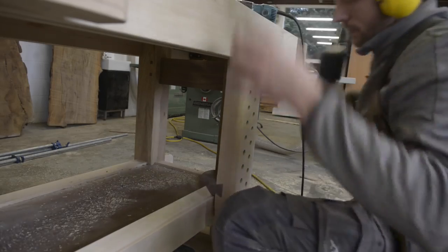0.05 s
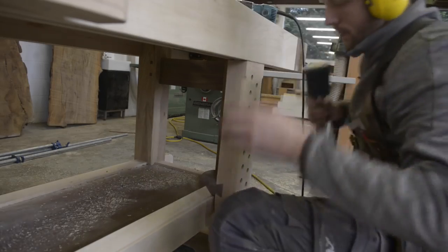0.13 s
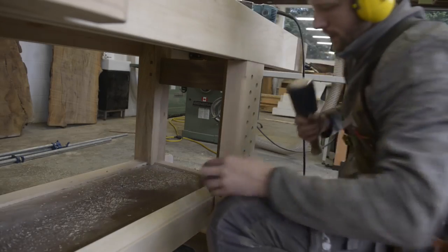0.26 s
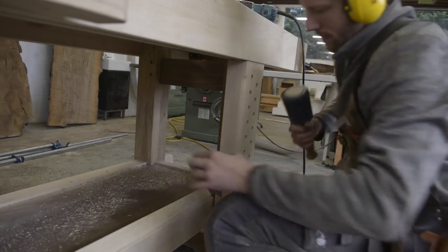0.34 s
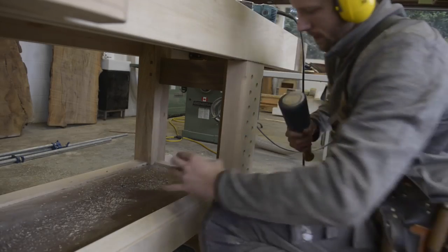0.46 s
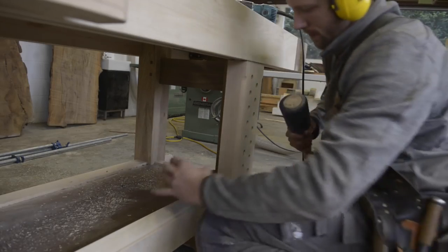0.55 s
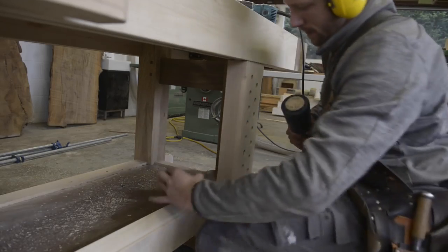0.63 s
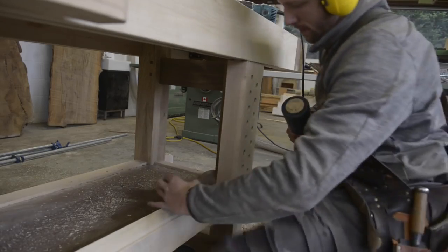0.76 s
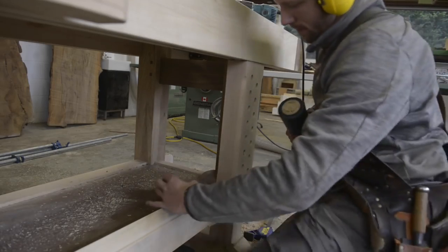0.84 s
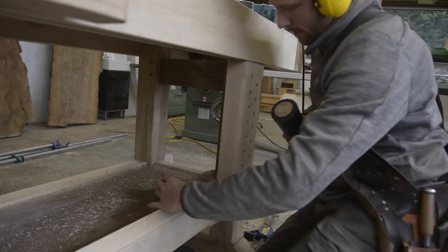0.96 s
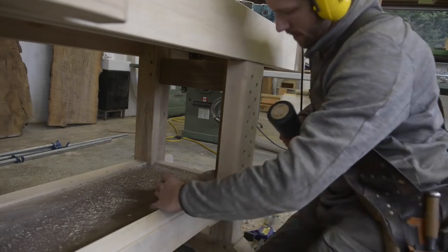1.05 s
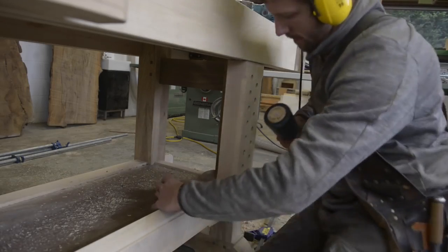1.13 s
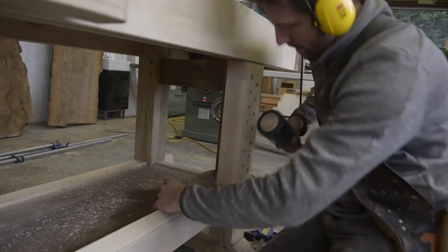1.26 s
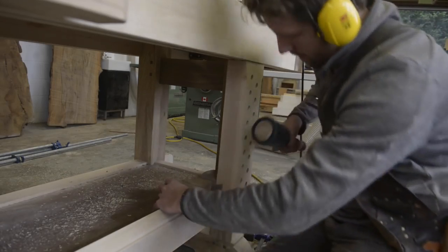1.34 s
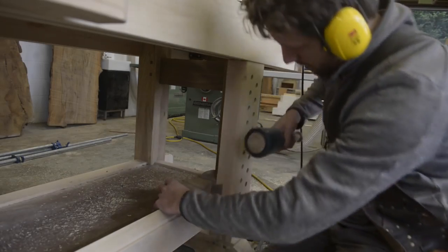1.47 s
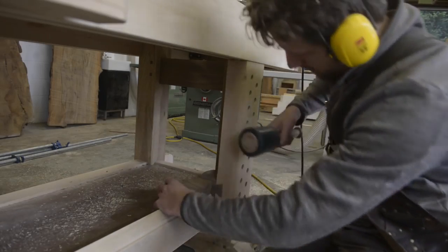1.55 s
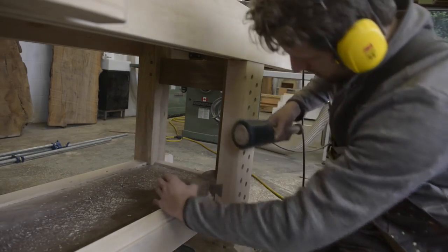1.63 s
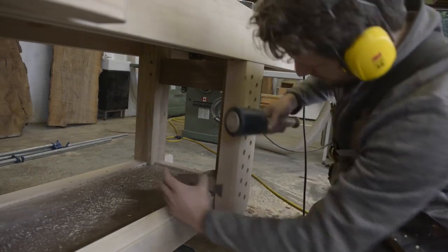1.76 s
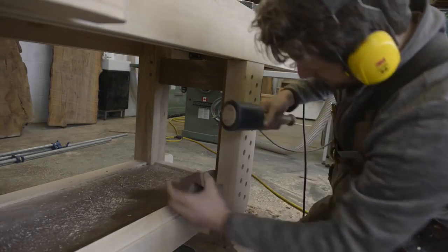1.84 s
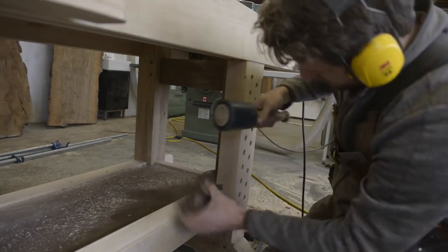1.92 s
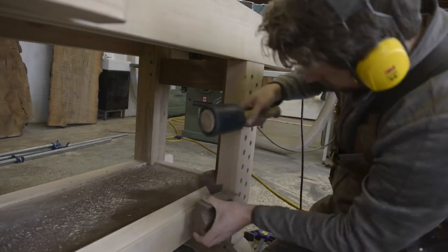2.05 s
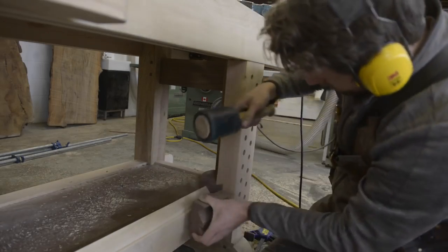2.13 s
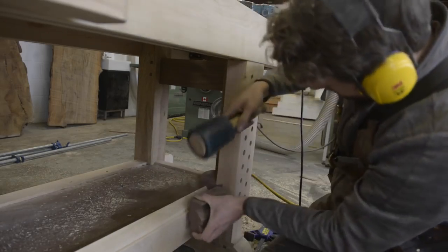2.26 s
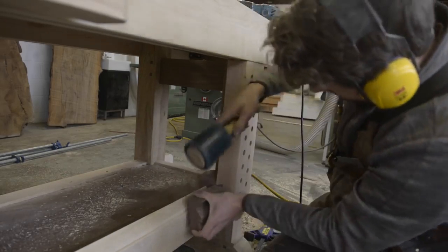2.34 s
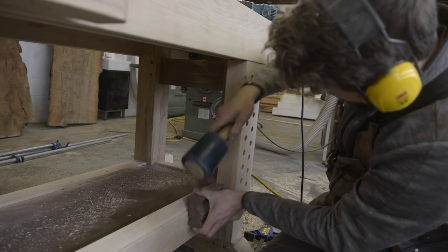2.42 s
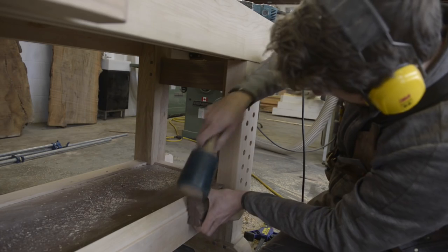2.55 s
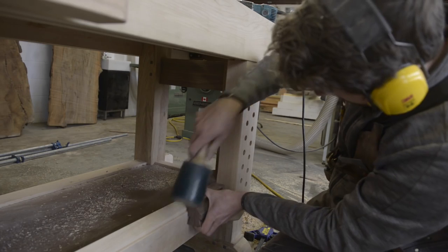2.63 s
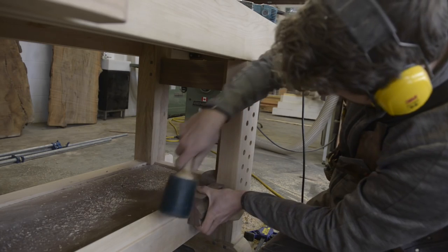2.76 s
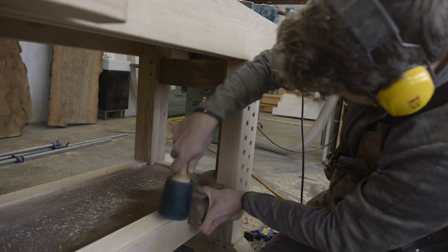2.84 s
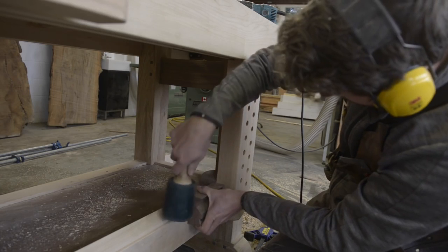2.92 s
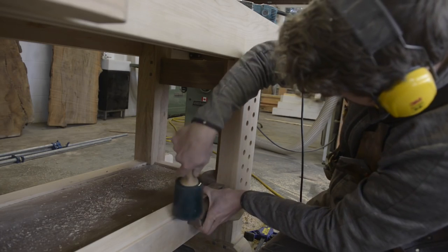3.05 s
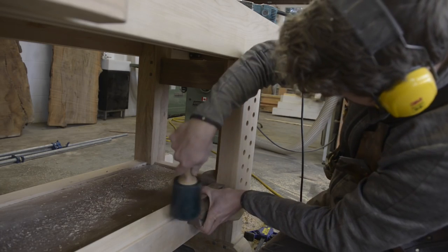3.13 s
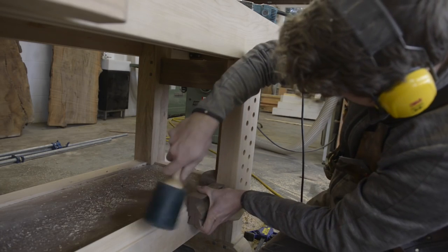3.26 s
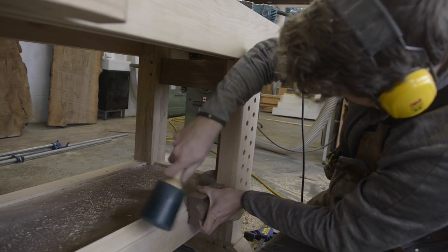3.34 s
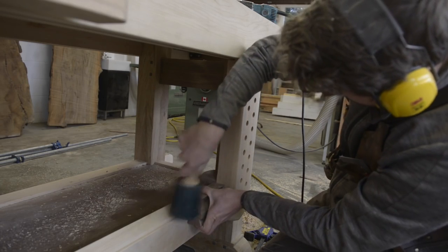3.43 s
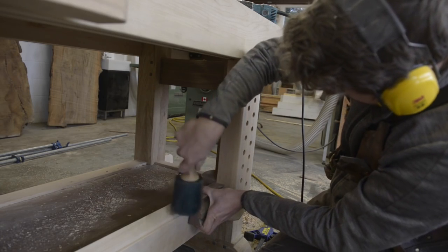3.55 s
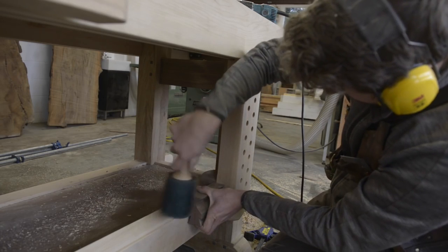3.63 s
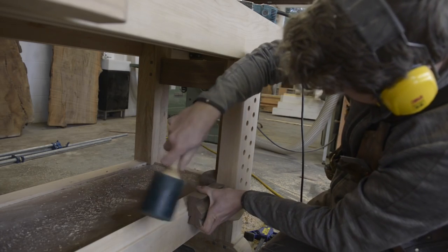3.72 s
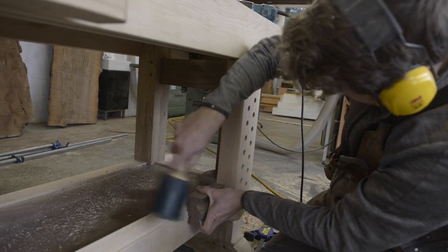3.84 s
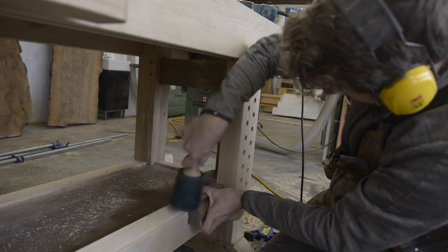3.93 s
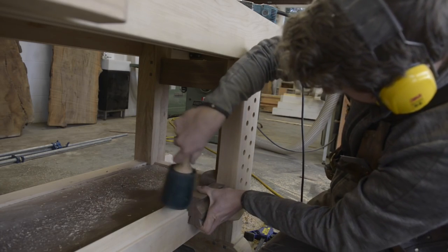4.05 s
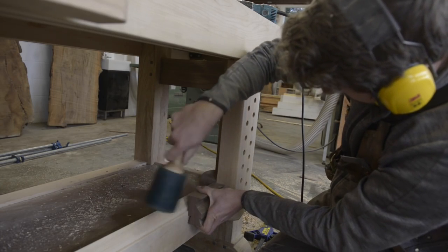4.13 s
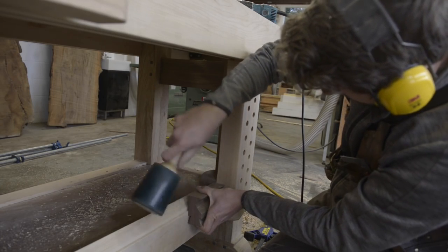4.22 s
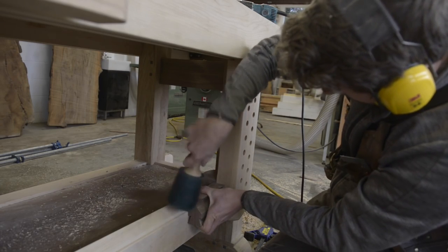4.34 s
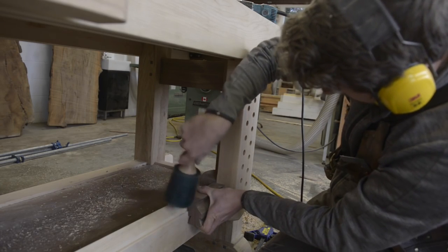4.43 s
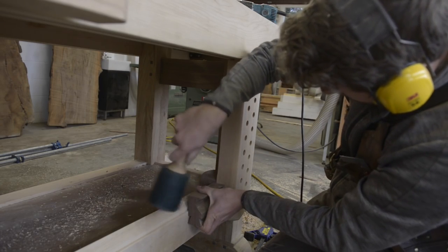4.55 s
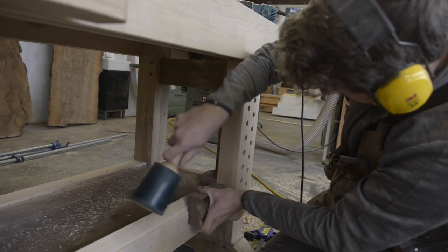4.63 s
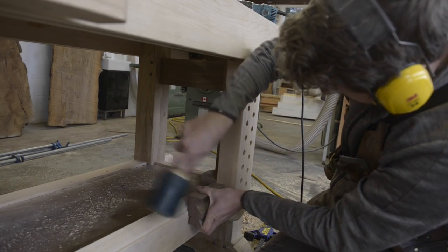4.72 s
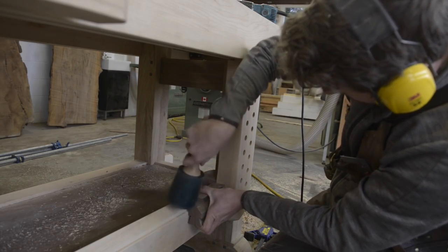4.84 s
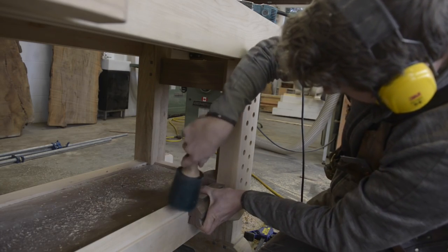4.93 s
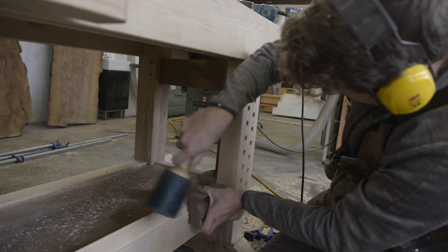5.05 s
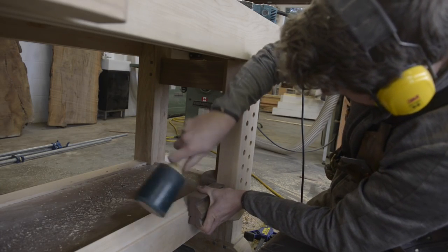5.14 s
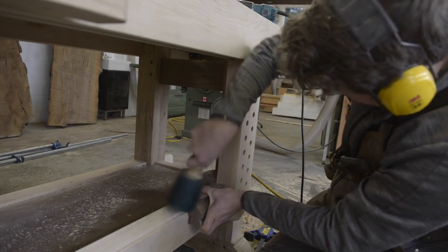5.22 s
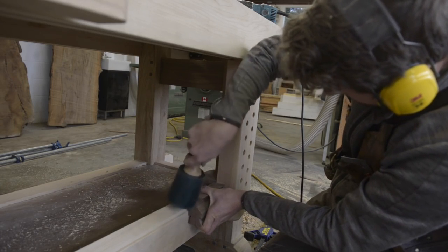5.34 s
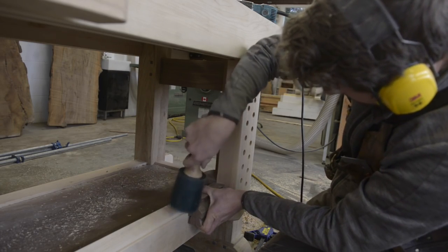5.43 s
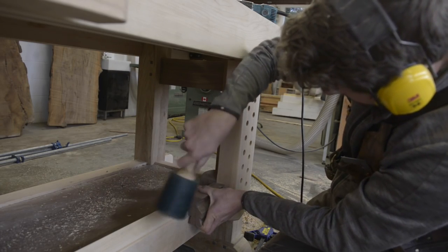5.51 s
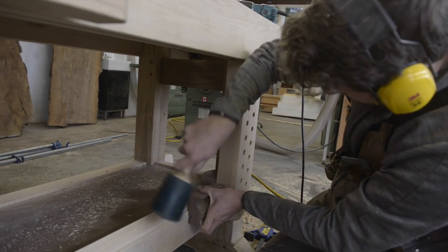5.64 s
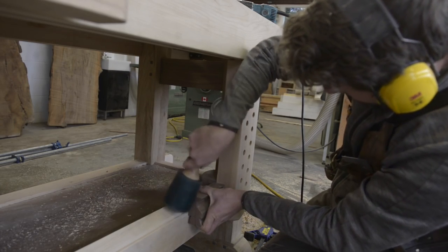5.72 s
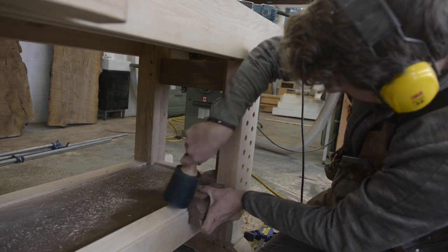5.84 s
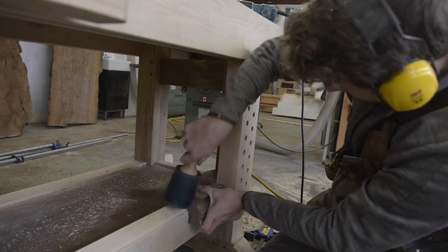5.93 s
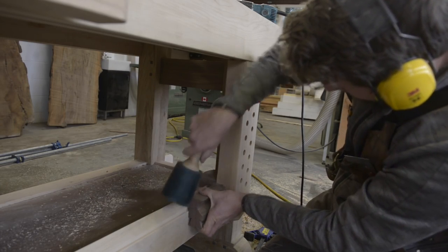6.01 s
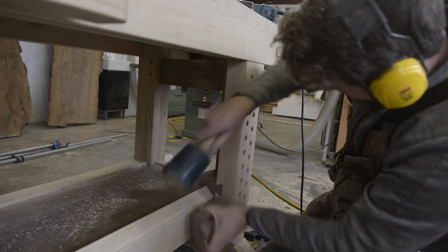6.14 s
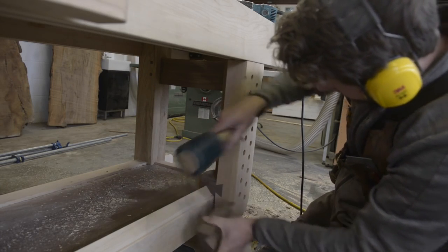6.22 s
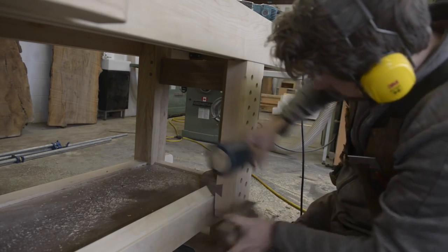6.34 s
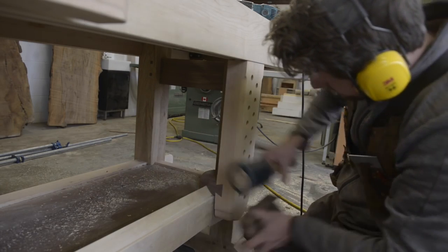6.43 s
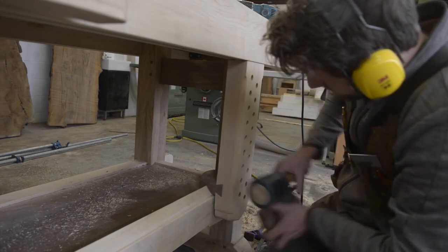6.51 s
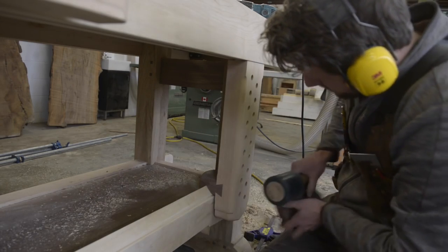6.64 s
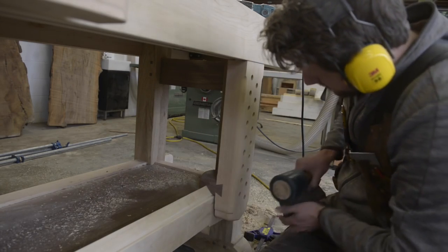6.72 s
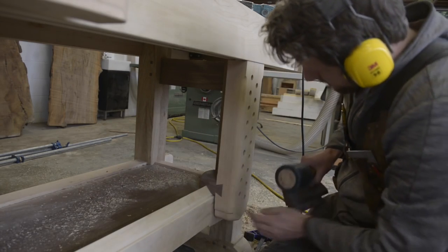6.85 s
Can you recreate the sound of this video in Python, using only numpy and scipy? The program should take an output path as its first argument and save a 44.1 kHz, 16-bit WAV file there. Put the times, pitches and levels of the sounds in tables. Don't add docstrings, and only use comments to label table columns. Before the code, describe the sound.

Soft fabric rustling over low room air, a muted touch and a firmer wooden clack, then faint dragging and small finger clicks. After a near-silent pause with one soft tap, a rubber-headed mallet strikes a block against a heavy timber frame six times, dull but powerful, building to near overload. Each knock rings briefly and blooms in the hall. Sleeves, falling grit and a small click end it. Close microphone, one channel.

```python
import sys
import numpy as np
from scipy import signal
from scipy.fft import rfft, irfft
from scipy.io import wavfile
from scipy.ndimage import uniform_filter1d

SR = 44100
rng = np.random.default_rng(int(sys.argv[2]) if len(sys.argv) > 2 else 0)


def transcribe(u):
    v = np.clip(np.atleast_2d(u).T, -1, 1)
    q = np.round(v * 32767).astype(np.int16)
    wavfile.write(sys.argv[1], SR, q)


def invert_db(level):
    return 10 ** (np.asarray(level, dtype=float) / 20)


N = 303171

# f/Hz, density/dB per Hz
AIR_SPECTRUM = [(15, -47.5), (25, -25), (92, 1.5), (270, 9), (775, -4.5), (1100, 1), (4870, -23.5),
                (10700, -19), (14800, -22.5), (16000, -58)]
# start t/s, hold/s, hiss level/dB, low scuff/dB above hiss, sleeve swish/dB above hiss
MOVEMENTS = [(-.05, .12, -59, 2, -8), (0.047, 0.013, -57, -8, -13), (.13, 0.21, -63.5, 1, -0.5),
             (0.335, 0.13, -56.5, -1, -2), (0.493, 0.19, -59.5, 4, -9), (0.69, 0.21, -57, -4, 0.5),
             (.9, 0.29, -60.5, 1, -1.5), (1.216, 0.067, -60, 2, -2), (1.39, 0.097, -65.5, 10, -1.5),
             (1.504, 0.28, -69.5, 9, -3), (1.72, 0.23, -60, .1, -1), (1.995, .33, -67.5, 3.3, -5),
             (2.38, 0.18, -70, 5, -10), (2.6, 0.18, -69.5, 9.5, -10), (2.85, .3, -78.5, 5, -4),
             (3.248, 0.3, -85, 15, -4), (6.006, 0.1, -67.5, 24, -7), (6.185, 0.18, -65.5, 3, 3),
             (6.284, 0.36, -60, -2.5, 3), (6.688, 0.15, -62.5, -1, -4)]
# f/Hz, density/dB per Hz
CLOTH_SPECTRUM = [(880, -48), (1500, -0.5), (1710, -9), (1850, -7.5), (2590, -0.5), (7240, -7), (11500, -6),
                  (13700, -14.5), (16000, -12.5)]
# f/Hz, density/dB per Hz
SCUFF_SPECTRUM = [(18, -38.5), (30, -7), (184, -1.5), (386, -4.5), (500, -0.5), (548, -6), (601, -2.5),
                  (1110, -7.5), (2500, -15), (3250, -54.5), (5500, -120)]
# lower f/Hz, upper f/Hz
WEAVE_BANDS = [(900, 3500), (3500, 8500), (8500, 12000), (12000, 18000)]
# f/Hz, width/Hz, level/dB
DRAG_RESONANCES = [(1100, 270, 5.5), (2420, 88, 2), (4800, 540, -3), (6900, 1500, -8), (10500, 600, -11)]

# t/s, peak level/dB, centre f/Hz
TICKS = [(0.0668, -41, 5490), (0.5294, -60, 7390), (0.8094, -45, 5800), (1.0694, -53, 4540),
         (3.4968, -48, 9780), (4.3044, -63, 4800), (6.0774, -38.5, 4550), (6.1005, -42, 4700),
         (6.1416, -37, 4660), (6.4544, -45.5, 6770), (6.6064, -47, 9400), (6.7544, -46, 8370)]
# t/s, peak level/dB, centre f/Hz
BUMPS = [(0.529, -44, 650), (0.677, -47, 270), (1.235, -52, 214), (1.714, -49, 210), (1.943, -45, 253),
         (2.698, -40, 460), (2.857, -51, 374), (6.752, -47, 264), (6.825, -57, 440), (6.854, -54, 573)]
# t/s, peak level/dB, centre f/Hz
CLICKS = [(0.475, -42.5, 1100), (1.68, -55, 1400), (1.717, -46, 1500), (1.966, -44, 1060),
          (2.06, -53, 2200), (2.14, -55, 1800), (2.187, -49.5, 1500), (2.21, -56, 1800), (2.783, -45, 1630),
          (2.996, -48, 1310), (3.106, -54, 900), (3.446, -56, 1510), (3.487, -43.5, 1200),
          (6.643, -39.5, 890), (6.755, -50, 1500), (6.828, -53, 1900), (6.862, -52.5, 2300)]
# t/s, peak level/dB, centre f/Hz
DUST = [(2.11, -55, 10500), (2.233, -60, 13000), (2.48, -57, 12500), (2.495, -59, 11000),
        (2.7975, -57, 10400), (2.8659, -54, 12700), (2.9163, -53, 12600), (2.9452, -61, 12400),
        (2.9594, -59, 10700), (3.1976, -57, 10900), (3.2365, -57, 10500), (6.0302, -53, 12500),
        (6.0965, -51, 10900), (6.1195, -68, 9500), (6.1195, -50, 13100), (6.1314, -55, 10400),
        (6.1524, -56, 10500), (6.1634, -62, 9880)]
# t/s, peak level/dB
JINGLES = [
    (6.316, -49.5),
    (6.335, -56),
]
# f/Hz, level/dB, t60/s
TOOL_MODES = [(10600, -5, 0.13), (11600, 1, 0.082), (15450, 2, .06)]

# t/s, peak level/dB, thump/dB, knock/dB, crack/dB
PLACED = [
    (0.841, -34.5, -0.5, -21, .1),
    (1.325, -25, -5, -1.5, -5),
]
# t/s, peak level/dB, thump/dB, knock/dB, crack/dB
SEATED = [
    (2.54, -26.5, 7.5, -6.5, -21),
]
# t/s, peak level/dB, thump/dB, knock/dB, crack/dB
TAPS = [
    (3.122, -27, 9.9, -1, 10.3),
    (3.531, -34, 25, 5.5, 3.3),
]
# t/s, peak level/dB, hall level/dB
BLOWS = [
    (3.548, -9, -3.5),
    (4.014, -9.5, -1.5),
    (4.447, -6.5, -2),
    (4.877, -4.5, 0),
    (5.339, -2, -0.5),
    (5.806, -1, -2.5),
]
# t/s, peak level/dB, crack/dB, hall level/dB
REBOUNDS = [
    (5.376, -8.5, -4, -13.5),
    (5.843, -10, -12.5, -10),
    (4.055, -20, -14.5, -10),
    (4.892, -13.5, -1.5, -5.5),
    (4.912, -10.5, -3.5, -10),
]
# first blow level/dB, change/dB per blow
THUMP_TREND = (1, -1.29)
KNOCK_TREND = (5, -1.45)
CRACK_TREND = (-0.5, -0.69)
BANDS_HZ = [170, 550, 1800, 7000]

# f/Hz, level/dB, t60/s
LOOSE_MODES = [(370, 11, 0.32), (435, 4, 0.9), (597, -17, 0.27), (751, 27, 0.35), (1010, -12, 0.23),
               (1160, -18, .15), (1513, 23.5, 0.23), (1960, -6, 0.11), (2390, 26.5, 0.12)]
# f/Hz, level/dB, t60/s
WEDGED_MODES = [(406, 0, 0.26), (588, -2.5, 0.41), (656, 1, 0.34), (945, 0, 0.22), (1137, -14, .2),
                (1425, -7, .2), (1680, -3, .15), (2430, 2.5, .16), (2530, -11, 0.069)]
# f/Hz, level/dB, t60/s
RAIL_MODES = [(402.5, -2.5, 0.37), (465.5, -1, 0.57), (607, -16.5, 0.28), (885, -9, .2), (1060, -17, 0.19),
              (1404, -2, 0.29), (1680, -10, 0.17), (2370, -15, 0.19)]
# f/Hz, level/dB, t60/s
FRAME_MODES = [(329, -6.5, 1), (367, -10, 0.35), (410.5, -5.5, 0.31), (473.6, -1.5, 0.5), (526, -3.5, 0.31),
               (550, -14.5, 0.28), (591, -5, 0.43), (639.3, -3.5, 0.57), (676, -12.5, 0.58),
               (730.3, -0.5, 0.42), (791.4, -2.5, 0.37), (920, -6, 0.22), (966, -15.5, .3),
               (1187, -13.5, 0.19), (1282, -10.5, 0.33), (1384, -2.5, 0.34), (1630, -12.5, 0.32),
               (1770, -16, 0.17), (1898, -16, 0.25), (2072, -25, 0.14), (2490, -12.5, 0.15),
               (3120, -20.5, 0.11), (3573, -18.5, .15)]
# f/Hz, level/dB, t60/s
BENCH_MODES = [(98.7, -22.5, 0.26), (105.8, -22, 0.92), (116.1, -18, 0.34), (188, -15, 0.3), (210, -26, .4),
               (229.4, -20.5, 0.17), (256.6, -17, 0.43)]
# f/Hz, density/dB per Hz
LOOSE_RATTLE = [(59, -61), (100, -23.5), (484, -6), (854, -10.5), (1510, -11), (1780, -32), (1950, -14),
                (2430, -15), (2660, -36), (8000, -47), (10400, -80), (17600, -120)]
# f/Hz, density/dB per Hz
TIMBER_RATTLE = [(24, -54.5), (40, -43.5), (140, -18.5), (204, -9.5), (354, -9), (422, -4), (663, -6),
                 (790, -11), (965, -9), (1590, -9), (3930, -24.5), (13800, -31.5), (16000, -41)]
# f/Hz, density/dB per Hz
RADIATED = [(24, -56.5), (40, -38.5), (83, -17), (163, -8), (231, -2.5), (320, -6.5), (585, -0.5),
            (733, -7.5), (831, -11), (918, -11), (1040, -12), (1810, -17), (3300, -35.5), (11300, -57),
            (16000, -71.5)]

# delay/s, level/dB
WALLS = [(0.018, -18.5), (.037, -16), (.055, -23)]
# f/Hz, t60/s
HALL_DECAY = [(60, 0.79), (160, 0.99), (420, 0.94), (1100, 0.93), (2910, 0.83), (7680, 0.36)]


def shape(x, points):
    hz, db = np.transpose(points)
    grid = np.linspace(1, SR / 2, 2049)
    ceps = irfft(np.interp(np.log(grid), np.log(hz), db) * np.log(10) / 20)
    ceps[1:2048] *= 2
    ceps[2049:] = 0
    response = irfft(np.exp(rfft(ceps)))
    return signal.fftconvolve(x, response)[:len(x)]


def unit(x):
    return x / np.sqrt(np.mean(x ** 2))


def band(x, lo_hz, hi_hz):
    return signal.sosfilt(signal.butter(2, [lo_hz, min(hi_hz, .45 * SR)], "band", fs=SR, output="sos"), x)


def fade(t, t60):
    return np.exp(-np.log(1000) * t / t60)


def swell(hold_s, attack_s, t60):
    t = np.arange(int(1.2 * SR)) / SR
    attack = np.sin(np.pi / 2 * np.clip(t / attack_s, 0, 1)) ** 2
    return attack * fade(np.clip(t - attack_s - hold_s, 0, None), t60)


def add(out, x, s):
    i = int(s * SR)
    out[i:i + len(x)] += x[:N - i]


def walk(rate):
    k = int(SR / rate)
    steps = np.repeat(rng.standard_normal(N // k + 1), k)
    return uniform_filter1d(uniform_filter1d(steps, k), k)[:N]


def ring(modes, t, damp, scatter_db):
    hz, db, t60 = (c[:, None] for c in np.transpose(modes))
    detune, phase, strength = rng.standard_normal((len(hz), 3)).T[:, :, None]
    tone = np.sin(2 * np.pi * (hz * (1 + 0.0096 * detune) * t + phase))
    decay = fade(t, damp * np.clip(t60, .05, .7))
    return np.sum(invert_db(db + scatter_db * strength) * decay * tone, axis=0)


def room_air():
    return unit(shape(rng.standard_normal(N), AIR_SPECTRUM)) * invert_db(-66.5)


def clothes():
    power = np.zeros((3, N + SR))
    for s, length, db, scuff_db, swish_db in MOVEMENTS:
        attack_share = 0.21
        move = swell(length * (1 - attack_share), 0.011 + attack_share * length, t60=0.57) ** 2
        levels = invert_db(db + np.array([[0], [scuff_db], [swish_db]]))
        i = int((s + 1) * SR)
        power[:, i:i + len(move)] += levels ** 2 * move[:N + SR - i]
    hissing, scuffing, swishing = np.sqrt(power[:, SR:])

    fibres = shape(rng.standard_normal(N) * invert_db(2 * walk(400) + .5 * walk(17)), CLOTH_SPECTRUM)
    scuff = unit(shape(rng.standard_normal(N) * invert_db(1.7 * walk(40)), SCUFF_SPECTRUM))
    patches = sum(band(fibres, lo, hi) * (invert_db(1.2 * walk(12)) - 1) for lo, hi in WEAVE_BANDS)
    hiss = unit(fibres + patches)
    upper = band(rng.standard_normal(N), 6330, 7670) * invert_db(1.2 * walk(17))
    lower = band(rng.standard_normal(N), 4400, 5800) * invert_db(1.5 * walk(14))
    swish = unit(upper + 0.66 * lower)
    return scuff * invert_db(-1.5) * scuffing + hiss * invert_db(-2.5) * hissing + swish * invert_db(-6.5) * swishing


def squeak():
    t = np.arange(N) / SR
    start_s, top_s, period_s = 6.655, 6.712, .2
    hz = 13050 + 340 * np.cos(2 * np.pi * (t - top_s) / period_s)
    falter_db = -12 * np.exp(-((t - 6.765) / .02) ** 2)
    db = -79 + falter_db + 3 * walk(80)
    onset = np.clip((t - start_s) / .01, 0, 1)
    return np.sqrt(2) * np.sin(2 * np.pi * np.cumsum(hz) / SR) * invert_db(db) * onset


def slide():
    start_s, level_db, sag_db_per_s = 1.72, -59.5, -25
    tones, pull = np.zeros(N), np.zeros(N)
    for hz, width, db in DRAG_RESONANCES:
        grip = unit(band(rng.standard_normal(N), hz - width / 2, hz + width / 2))
        tones += invert_db(db + 2.2 * walk(29.6)) * grip
    add(pull, swell(hold_s=0.25, attack_s=0.027, t60=.15), start_s)
    sag_db = sag_db_per_s * np.clip(np.arange(N) / SR - start_s, 0, 1)
    return unit(tones) * invert_db(level_db + sag_db) * pull


def small_things():
    out, t = np.zeros(N), np.arange(int(.2 * SR)) / SR
    # table, t60/s, half-width as a frequency ratio, skirt level/dB
    kinds = [(TICKS, .008, 1.35, -13), (BUMPS, .03, 1.7, -45), (CLICKS, .015, 1.9, -35), (DUST, .005, 1.4, -20)]
    for table, t60, width, skirt_db in kinds:
        for s, db, hz in table:
            grain = band(rng.standard_normal(len(t)) * fade(t, t60), hz / width, hz * width)
            grain = band(grain, hz / width, hz * width) + invert_db(skirt_db) * grain
            add(out, invert_db(db) * grain / np.abs(grain).max(), s - .001)
    for s, db in JINGLES:
        chatter = np.abs(band(rng.standard_normal(len(t)), 20, 300)) * 9
        add(out, invert_db(db) * ring(TOOL_MODES, t, 0.65, scatter_db=0) * chatter, s)
    return out


def walls(x):
    out, dull = x.copy(), band(x, 79, 5000)
    for delay, db in WALLS:
        add(out, invert_db(db) * dull[:N - int(delay * SR)], delay)
    return out


def hall(x, wet_db, build_s):
    t = np.arange(int(1.3 * SR)) / SR
    tail = np.zeros(len(t))
    hz, t60 = np.transpose(HALL_DECAY)
    for centre in 45 * 2 ** np.arange(0, 8.6, .5):
        noise = band(rng.standard_normal(len(t)), centre / 2 ** 0.2, centre * 2 ** 0.32)
        decay = fade(t, np.interp(np.log(centre), np.log(hz), t60))
        tail += noise * decay / decay[int(.1 * SR)]
    tail *= 1 - np.exp(-t / build_s)
    return invert_db(wet_db) * signal.fftconvolve(x, tail)[:N]


def knock(row, modes, damp, dense_db, body_t60, rise_ms, scatter_db, rattle):
    s, peak_db, thump_db, knock_db, crack_db, hall_db = row
    tilt = [thump_db, 0, knock_db, crack_db]
    t = np.arange(int(.6 * SR)) / SR
    clear = shape(ring(modes, t, damp, scatter_db), list(zip(BANDS_HZ, [0, 0, knock_db, 0])))
    out = clear / np.abs(clear).max() * (1 - np.exp(-(t * 1000 / rise_ms) ** 2))

    dense = rfft(unit(shape(rng.standard_normal(len(t)), rattle)))
    place = np.interp(np.log(np.linspace(1, SR / 2, len(dense))), np.log(BANDS_HZ), np.arange(4))
    lags, lasts = [2.8, 0.69, 0.8, 0.85], [2.8, 1.42, 0.81, 0.29]
    for k in range(4):
        part = irfft(dense * np.clip(1 - np.abs(place - k), 0, 1), len(t)) * fade(t, body_t60 * lasts[k])
        rise = 1 - np.exp(-(t * 1000 / (rise_ms * lags[k])) ** 2)
        out += invert_db(dense_db + tilt[k]) * part * rise
    out += invert_db(thump_db) * ring(BENCH_MODES, t, 0.93, scatter_db=3) * (1 - np.exp(-t / 0.025))

    colour = [(hz, db + np.interp(np.log(hz), np.log(BANDS_HZ), 1.29 * np.array(tilt))) for hz, db in RADIATED]
    push = shape(np.eye(1, len(t))[0], colour)
    push = push / np.sqrt(np.sum(push ** 2))
    push = push + invert_db(-7) * clear / np.sqrt(np.sum(clear ** 2))
    return invert_db(peak_db) * out, invert_db(peak_db + hall_db) * push / np.sqrt(np.sum(push ** 2))


def mallet():
    direct, feeds = np.zeros(N), np.zeros((2, N))
    placed = [(*row, -5) for row in PLACED]
    seated = [(*row, -4.5) for row in SEATED]
    taps = [(*row, -2) for row in TAPS]
    blows = []
    for k, (s, db, hall_db) in enumerate(BLOWS):
        colour = [first + k * step for first, step in (THUMP_TREND, KNOCK_TREND, CRACK_TREND)]
        blows.append((s, db, *colour, hall_db))
    for s, db, crack_db, hall_db in REBOUNDS:
        blows.append((s, db, 0, -0.5, crack_db, hall_db))

    loose = dict(modes=LOOSE_MODES, damp=0.34, dense_db=-0.5, body_t60=0.11, rise_ms=0.54, scatter_db=11,
                 rattle=LOOSE_RATTLE)
    wedged = dict(modes=WEDGED_MODES, damp=0.47, dense_db=-5, body_t60=0.12, rise_ms=2.4, scatter_db=3,
                  rattle=LOOSE_RATTLE)
    held = dict(modes=RAIL_MODES, damp=0.37, dense_db=-1, body_t60=0.064, rise_ms=2.5, scatter_db=-1,
                rattle=TIMBER_RATTLE)
    frame = dict(modes=FRAME_MODES, damp=0.28, dense_db=-2.5, body_t60=0.12, rise_ms=5.76, scatter_db=3.5,
                 rattle=TIMBER_RATTLE)
    # contacts, timber, lead of the onset/s
    kinds = [(placed, loose, .0008), (seated, wedged, .0011), (taps, held, .0009), (blows, frame, .003)]
    for table, timber, lead in kinds:
        for row in table:
            sound, push = knock(row, **timber)
            turn = rng.uniform(0, np.pi / 2)
            add(direct, sound, row[0] - lead)
            add(feeds[0], np.cos(turn) * push, row[0] + .004)
            add(feeds[1], np.sin(turn) * push, row[0] + .004)
    return direct, feeds


def scene():
    wood, feeds = mallet()
    bits = small_things()
    tails = sum(hall(feed + invert_db(-47) * bits, wet_db=-17, build_s=0.0035) for feed in feeds)
    return (room_air() + clothes() + squeak() + slide() + bits + walls(wood) + tails)[None]


def top_cut(x):
    return signal.sosfilt(signal.butter(12, 16510, fs=SR, output="sos"), x)


def record(dry):
    ceiling = .7
    limited = ceiling * np.tanh(dry / ceiling)[0]
    top = signal.ellip(10, .5, 45, 15800, fs=SR, output="sos")
    mix = band(signal.sosfilt(top, limited), 32, 19000)[None]
    return top_cut(mix)


dry = scene()
out = record(dry)
transcribe(out)
```